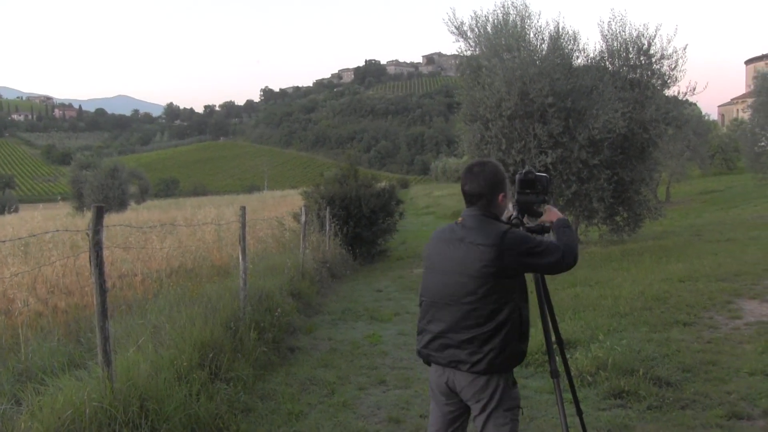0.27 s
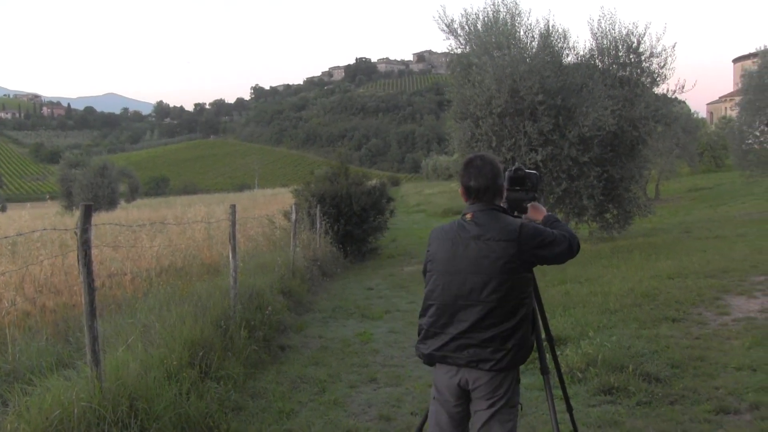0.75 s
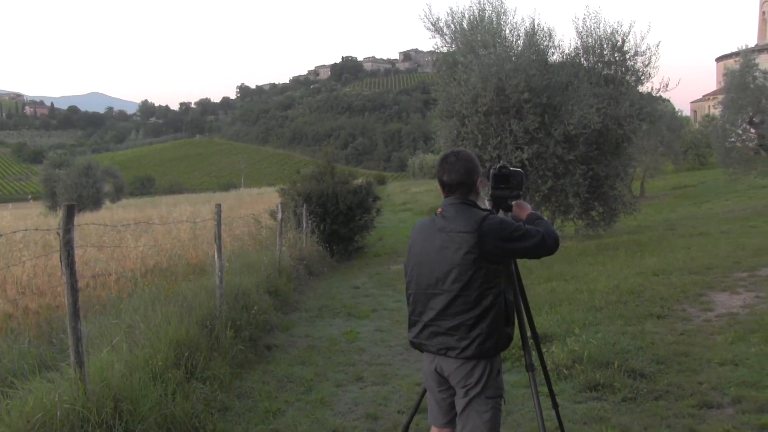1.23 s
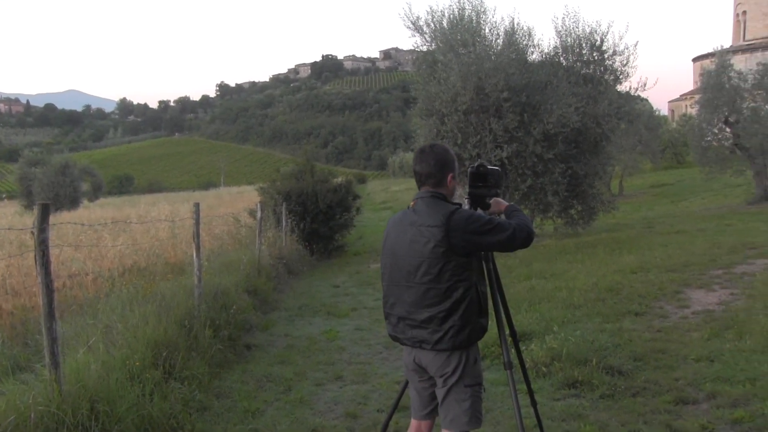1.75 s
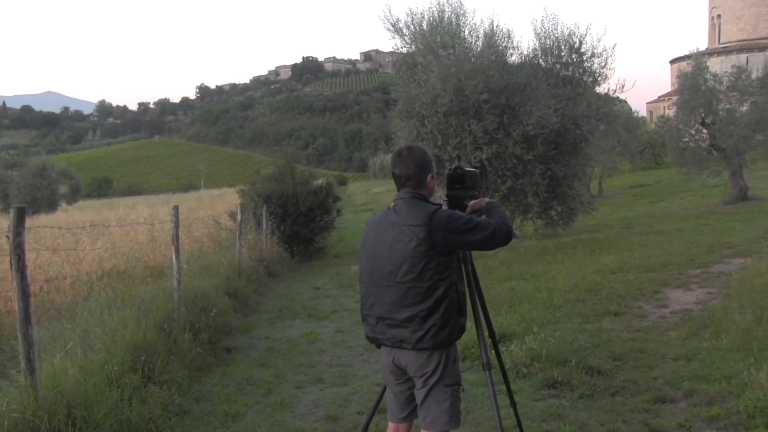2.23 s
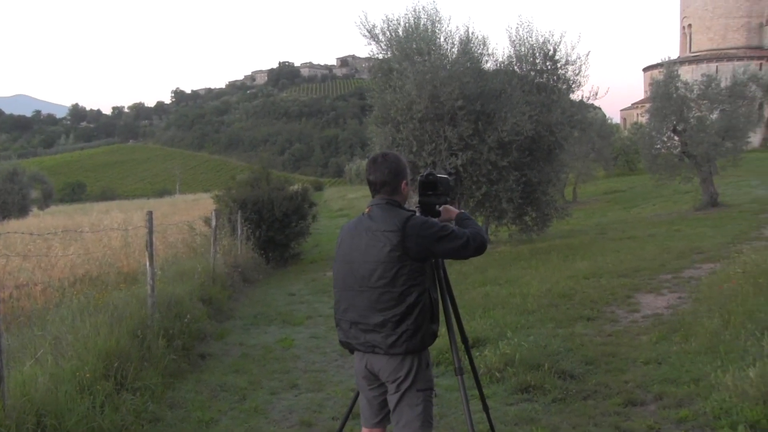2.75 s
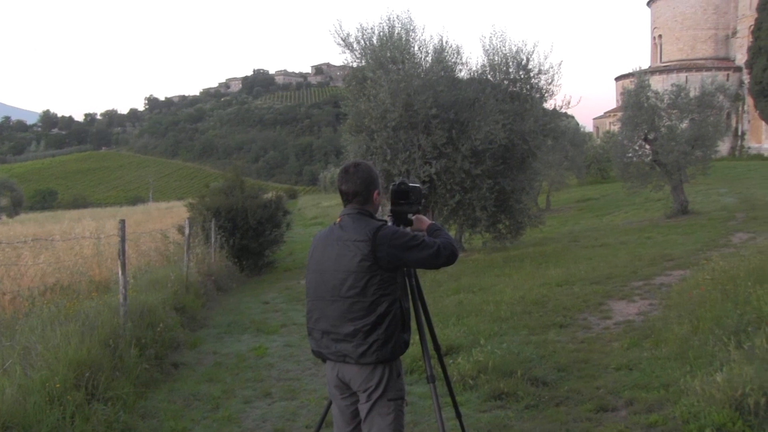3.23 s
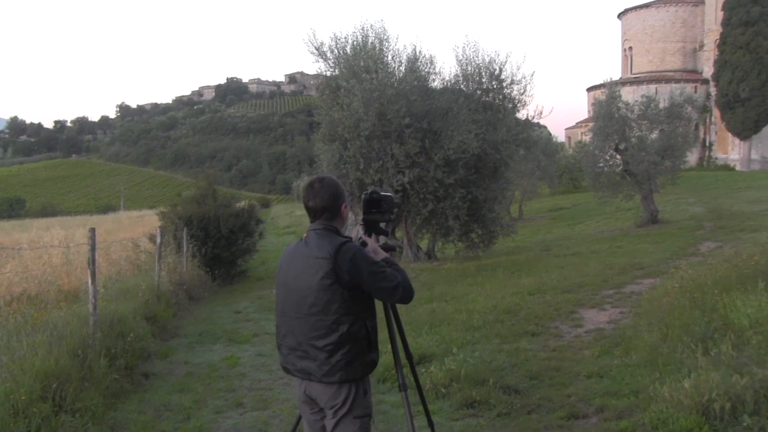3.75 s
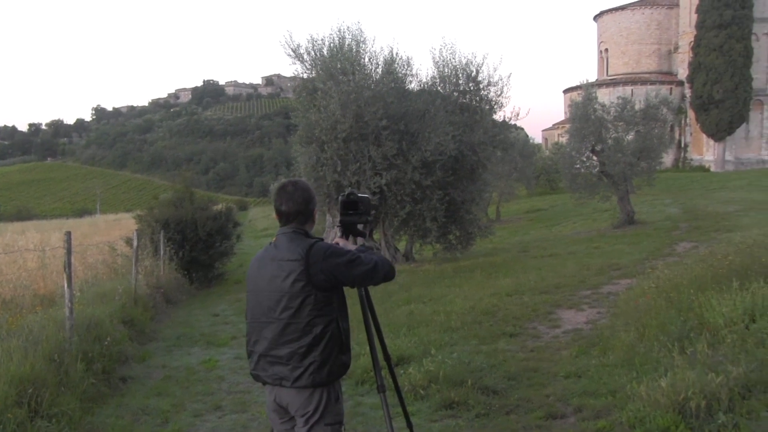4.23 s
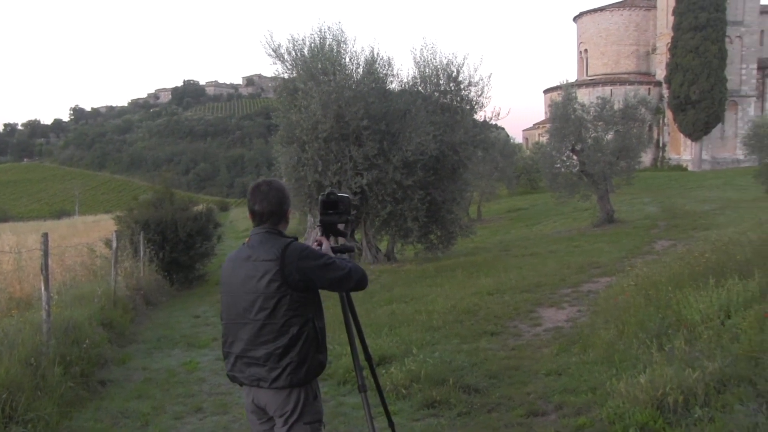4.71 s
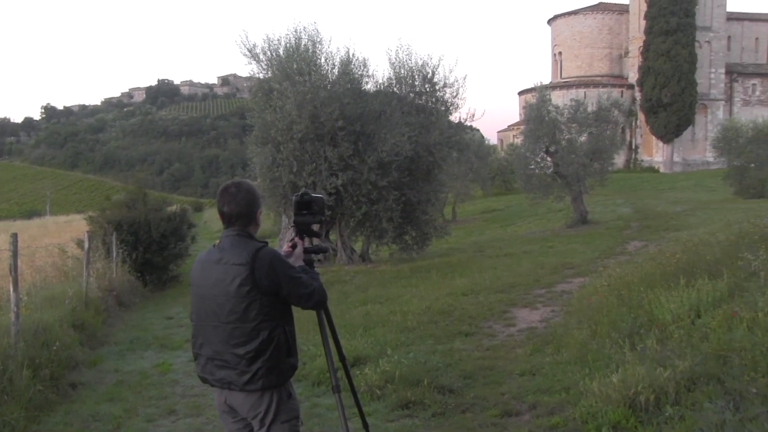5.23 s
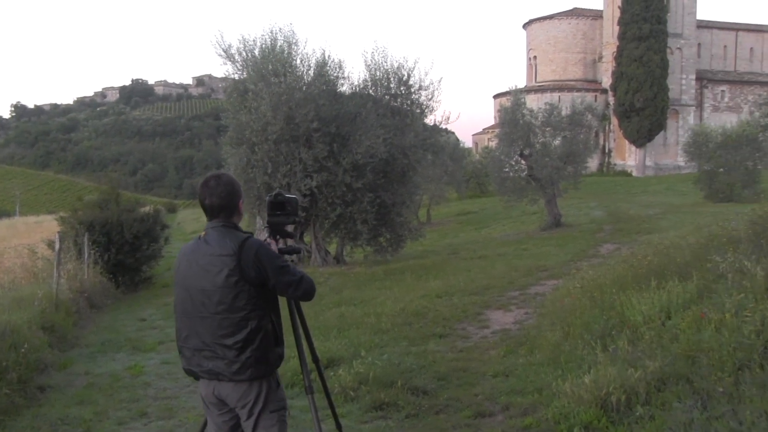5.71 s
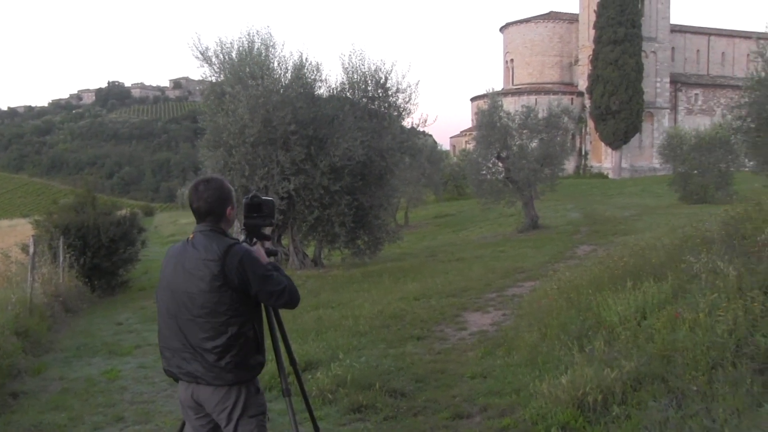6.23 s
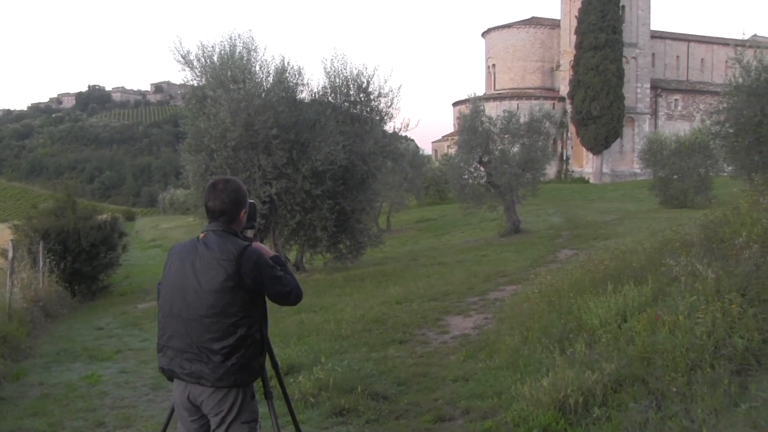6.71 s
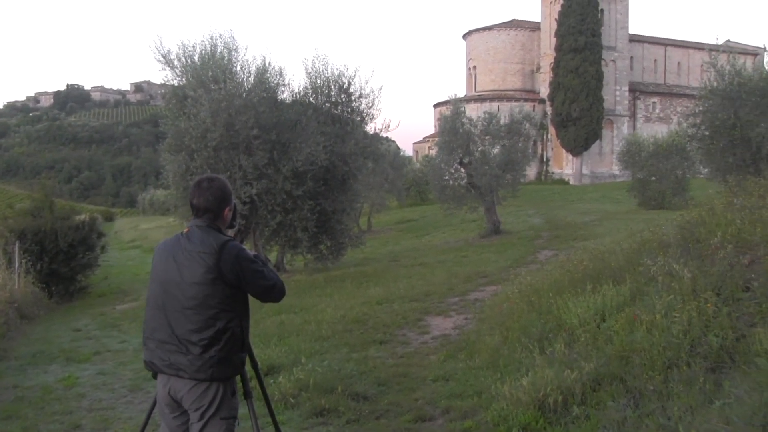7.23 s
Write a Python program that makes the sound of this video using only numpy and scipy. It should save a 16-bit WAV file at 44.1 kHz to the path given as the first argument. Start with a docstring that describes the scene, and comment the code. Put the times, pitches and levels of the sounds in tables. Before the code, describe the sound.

Outdoor dawn chorus in open countryside. Many small sparrows chatter without pause, slightly to the right, in rapid falling bouts. A blackbird whistles short clear phrases in the first three seconds, then even piping and a few quick ticks follow. Louder, closer chirps become frequent later. Doves coo low and far away, blurring to a faint hum under soft air noise and microphone hiss in wide stereo.

```python
"""A flock of sparrows chatters to the right, in the dawn chorus of open farmland: short sine chirps swell in bouts.
Doves coo far off as slow low sines, over a bed of air noise and microphone hiss made from narrow noise bands.
Louder sparrow chirps ring out clearly, and a blackbird whistles a few phrases among piping, ticks and thin tweets.
The voices scatter off leaves and walls, which adds a short dying tail of noise to each."""
import sys
import numpy as np
from scipy import signal
from scipy.io import wavfile
from scipy.ndimage import uniform_filter1d

SR = 44100
rng = np.random.default_rng(int(sys.argv[2]) if len(sys.argv) > 2 else 0)


def generate_wav(signal):
    """Clip the signal to [-1, 1] and save it as 16-bit WAV at the path in sys.argv[1]."""
    frames = np.transpose(np.atleast_2d(signal))
    scaled = np.clip(frames, -1, 1) * 32767
    pcm = np.round(scaled).astype(np.int16)
    wavfile.write(sys.argv[1], SR, pcm)


def voltage_ratio(level):
    """Linear amplitude factor for a level in decibels (scalar or array-like)."""
    return 10 ** (np.asarray(level, float) / 20)


N = 328986   # length of the scene in samples


def rms_one(x):
    """Scale to an rms (average strength) of 1."""
    return x / np.sqrt(np.mean(x ** 2) + 1e-20)


def wobble(shape, rate_hz):
    """Smooth random wander along the last axis, spread 1: noise with its quick changes filtered away."""
    r = np.exp(-2 * np.pi * rate_hz / SR)
    return rms_one(signal.lfilter([1], [1, -2 * r, r * r], rng.standard_normal(shape)))


def sing(notes, rough, flutter_db=3.0, rate_hz=220, edge=0.09, overtone_db=-40, swing=(0, 0), buzz_db=0):
    """Sines that glide along a curved pitch, with random flutter, a regular swing and a fast throb.

    Each note: start and length in seconds, start, middle and end pitch in Hz, level in dB, left minus right in dB.
    rough: pitch flutter as a share; edge: larger is softer at both ends; swing: times per second, share of pitch.
    """
    lead_per_db = 0.25   # samples of lead for each dB of left minus right
    out = np.zeros((2, N))
    for s, length, start, middle, end, db, pan in notes:
        n = int(length * SR)
        u = np.arange(n) / n   # 0 to 1 through the note
        shake = wobble((2, n + 400), rate_hz)[:, 400:]   # one for pitch, one for level
        beat = np.sin(2 * np.pi * swing[0] * u * length)

        bow = middle - (start + end) / 2
        hz = start + (end - start) * u + 4 * u * (1 - u) * bow
        hz = hz * (1 + rough * shake[0] + swing[1] * beat)
        phase = 2 * np.pi * (np.cumsum(hz) / SR + rng.random())
        lead = 2 * np.pi * hz / SR * lead_per_db * pan / 2   # the nearer side hears the bird first
        phase = np.array([phase + lead, phase - lead])

        throb_hz = 290 * rng.uniform(0.72, 1.32)
        throb = np.sin(2 * np.pi * (throb_hz * u * length + rng.random()))
        level_db = db + flutter_db * shake[1] + 3.5 * beat + buzz_db * (throb + 0.5)
        level = voltage_ratio(level_db) * np.sin(np.pi * u ** 0.99) ** edge
        tone = np.sin(phase) + voltage_ratio(overtone_db) * np.sin(2 * phase)
        pair = level * tone * voltage_ratio(np.array([[pan], [-pan]]) / 2)

        i = round(s * SR)
        a = max(i, 0)
        b = max(a, min(i + n, N))
        out[:, a:b] += pair[:, a - i:b - i]
    return out


def scatter(x, t60, wet_db):
    """Leaves, ground and walls: a noise tail falling 60 dB in t60 seconds, a different one for each side."""
    t = np.arange(int(.5 * SR)) / SR
    fade_in = np.minimum(t / 0.019, 1)
    tail = rng.standard_normal((2, len(t))) * voltage_ratio(-60 * t / t60) * fade_in
    tail /= np.sqrt(np.sum(tail ** 2, axis=1, keepdims=True))
    return x + voltage_ratio(wet_db) * signal.fftconvolve(x, tail, axes=1)[:, :N]


def perch(hz):
    """Left minus right in dB: the higher voices sit further to the right."""
    return np.interp(hz, [3200, 4300, 5500], [-2.2, -5.0, -5.5])


def bouts(hz):
    """Level in time of the voices around hz: they swell while a bout's falling pitch passes them."""
    # Bouts of chatter that start high and tumble down.
    # Each row: start in seconds, length in seconds, top pitch in Hz, level in dB before the carry below.
    bout_rows = [(-0.19, 0.39, 4900, -43), (0.077, 0.26, 4900, -44), (0.141, 0.34, 8050, -42.5),
                 (0.357, 0.24, 4800, -42.5), (0.5, 0.28, 7730, -43), (0.618, 0.43, 6240, -45),
                 (0.904, 0.3, 4280, -43.5), (1.099, 0.27, 6300, -39.5), (1.299, 0.28, 4960, -44.5),
                 (1.536, 0.17, 4470, -41), (1.626, 0.21, 5050, -40.5), (1.88, 0.26, 5340, -44),
                 (2.048, 0.23, 6500, -44.5), (2.17, 0.43, 5160, -44.5), (2.448, 0.17, 5900, -42.5),
                 (2.497, 0.32, 5000, -45), (2.78, 0.18, 6600, -45), (2.86, 0.36, 4430, -42),
                 (3.101, 0.2, 5600, -43.5), (3.169, 0.44, 4840, -42), (3.544, 0.28, 6000, -41.5),
                 (3.62, 0.48, 9700, -46.5), (3.888, 0.44, 4830, -43), (4.195, 0.25, 5330, -42),
                 (4.36, 0.26, 5500, -43), (4.562, 0.23, 5130, -41), (4.706, 0.28, 5000, -45.5),
                 (4.87, 0.38, 5350, -41), (5.154, 0.26, 5500, -42.5), (5.344, 0.25, 6200, -42),
                 (5.412, 0.47, 5450, -46.5), (5.729, 0.25, 5170, -42), (5.892, 0.21, 6600, -43),
                 (6.001, 0.42, 5650, -42), (6.212, 0.24, 9350, -45.5), (6.29, 0.5, 5350, -44.5),
                 (6.603, 0.44, 5370, -39.5), (6.605, 0.19, 6540, -43), (6.948, 0.18, 4800, -44),
                 (7.01, 0.36, 4100, -45), (7.221, 0.31, 6850, -40)]
    end_hz, reach_oct = 2790, 0.36   # where every bout lands; how far in pitch it draws voices in
    lull_db = -81                    # chatter between bouts, before the carry below

    t = np.arange(0, N + 100, 100) / SR
    octaves = np.log2(hz / 4000)
    carry_db = -5.5 * octaves                          # higher voices carry less
    carry_db = carry_db + 0.27 * t * min(octaves, 0)   # voices under 4 kHz lose ground as time passes
    carry_db = carry_db - 3 * (hz > 6000)              # the thinnest voices carry still less

    power = voltage_ratio(lull_db) ** 2
    for s, length, top_hz, db in bout_rows:
        u = np.clip((t - s) / length, 0, 1)
        bout_hz = top_hz * (end_hz / top_hz) ** u
        away = np.log2(bout_hz / hz) / reach_oct
        power = power + (voltage_ratio(db) * np.sin(np.pi * u)) ** 2 * np.exp(-away ** 2)
    return np.interp(np.arange(N) / SR, t, np.sqrt(power) * voltage_ratio(carry_db))


def flock():
    """Overlapping short chirps, mostly arched and falling fast, in groups of voices that swell with the bouts."""
    # The low, middle, high and top voices of the flock. Each row: chirps per second, centre in Hz,
    # pitch spread in octaves, fall in octaves (each chirp falls by its own random multiple of it).
    voice_groups = [(104.94, 3300, 0.1001, 0.231), (84.97, 4220, .095, 0.19), (64.95, 5150, 0.11, 0.1595),
                    (34.98, 6300, 0.11, 0.121)]
    out = 0
    for rate, hz, spread, fall in voice_groups:
        even = rng.random((1300, 2))
        bell = np.clip(rng.standard_normal((1300, 5)), -1.8, 1.8)
        draws = np.column_stack([even, bell])
        at = np.cumsum(.3 + 1.4 * draws[:, 0]) / rate - .05
        notes = []
        for t, (_, long, pitch, slide, bend, loud, side) in zip(at[at < N / SR], draws):
            centre = hz * 2 ** (spread * pitch)
            drop = 2 ** (fall * (.68 + 0.703 * slide) / 2)   # half the fall, on each side of the centre
            middle = centre * (1.02 + 0.0398 * bend)
            db = 3.77 * loud - 1.5 * pitch
            pan = perch(centre) + 2.8 * side
            notes.append((t, .009 + .024 * long, centre * drop, middle, centre / drop, db, pan))
        chirps = sing(notes, rough=0.012, edge=0.16, overtone_db=-27.5, buzz_db=4)
        voices = scatter(chirps, t60=0.12, wet_db=-2.5)
        # partly even out the crowd before the bouts shape it
        crowd = uniform_filter1d(np.mean(voices ** 2, axis=0), size=2600) + 1e-12
        out = out + rms_one(voices / crowd ** 0.28) * bouts(hz)
    return out


def near_doves():
    """A few coos that stand out: slow low sines whose pitch bows, further up in longer coos."""
    # The coos. Each row: start in seconds, length in seconds, start pitch in Hz, end pitch in Hz, level in dB.
    coos = [(-.05, 0.34, 468.6, 477, -54), (1.1, 0.43, 472.4, 493, -54.5), (1.78, 0.21, 553.6, 480.4, -55),
            (2.52, 0.14, 518.5, 453, -57), (2.87, 0.3, 462, 456, -54), (5.2, 0.168, 468.4, 523, -54),
            (5.5, 0.37, 501.6, 477, -53.5), (6.28, 0.13, 501, 481.6, -55.5)]
    arch_per_s = 0.1268   # bow as a share of pitch, for each second of length
    notes = []
    for s, length, a, b, db in coos:
        middle = (a + b) / 2 * (1 + arch_per_s * length)
        notes.append((s, length, a, middle, b, db, 1.5))
    near = sing(notes, rough=0.003, flutter_db=0.5, rate_hz=14, edge=0.16)
    return scatter(near, t60=0.36, wet_db=-9)


def far_doves():
    """Many far coos at random pitches, blurred by a long tail into a low hum."""
    notes = []
    for k, (height, late, long, start, end, side) in enumerate(rng.random((130, 6))):
        hz = 505 * (.88 + .27 * height)
        at = k * .06 - .3 + .05 * late
        start_hz = hz * (.95 + 0.073 * start)
        end_hz = hz * (.92 + 0.074 * end)
        notes.append((at, 0.0595 + .14 * long, start_hz, hz, end_hz, 0, 1.5 * (side - .5)))
    hum = scatter(sing(notes, rough=0.0395, rate_hz=34.5), t60=0.95, wet_db=-0.5)
    return voltage_ratio(-59.5) * rms_one(hum)


def air(patchy_db):
    """Air and microphone hiss: narrow bands of stereo noise, each with its level, slow flicker and likeness."""
    # Colour of the noise. Each row: frequency in Hz, relative level per Hz in dB.
    colour = np.array([(25, -15.5), (60, -5), (150, -2.5), (400, -0.5), (800, -4.5), (1900, -7),
                       (3000, 0.5), (6000, -13.5), (9000, -17), (13000, -21), (17000, -28)])
    # How alike left and right are. Each row: frequency in Hz, likeness from -1 (opposite) to 1 (the same).
    likeness = np.array([(40, 1), (150, -0.013), (700, -0.12), (1500, 0.56), (5000, 0.69), (9000, 0.95),
                         (14000, 0.9)])
    treble_hz, rustle_db = 6000, 0.23   # bands above this swell and sink together by this spread

    out = 0
    edges = 20 * 2 ** np.arange(0, 10.1, .4)
    rustle = np.repeat(wobble(N // 50 + 1, 400), 50)[:N]   # stretched 50 times: 400 becomes 8 Hz
    white = rng.standard_normal((2, 2, N))
    for k, (low, high) in enumerate(zip(edges, edges[1:])):
        band = signal.butter(2, [low, high], "band", fs=SR, output="sos")
        mid, side = signal.sosfilt(band, white[k % 2])   # neighbouring bands use different noise
        place = np.log(low * high) / 2
        alike = np.clip(np.interp(place, np.log(likeness[:, 0]), likeness[:, 1]), -1, 1)
        db = np.interp(place, np.log(colour[:, 0]), colour[:, 1])
        flicker = np.repeat(wobble(N // 50 + 1, 250), 50)[:N]   # stretched: 250 becomes 5 Hz
        level_db = db + patchy_db * flicker + (low > treble_hz) * rustle_db * rustle
        pair = np.sqrt(1 + alike) * mid + np.sqrt(1 - alike) * side * [[1], [-1]]
        out = out + voltage_ratio(level_db) * pair
    return voltage_ratio(-50) * rms_one(out)


def near_sparrows():
    """Short, clear, loud chirps with an overtone and a slight throb, most nearly level, a few falling steeply."""
    # The loudest chirps. Each row: start in seconds, length in seconds, start pitch in Hz, end pitch in Hz,
    # level in dB.
    chirps = [(0.286, 0.031, 5450, 4600, -47), (0.643, 0.05, 4890, 3320, -43),
              (1.202, 0.021, 5300, 4970, -41), (1.361, 0.047, 4800, 5200, -47),
              (2.9, 0.05, 3400, 3280, -39), (3.706, 0.052, 3290, 3150, -42), (4.232, .055, 5080, 5070, -50),
              (4.308, 0.022, 3220, 2200, -51.5), (4.592, 0.028, 4056, 4070, -38),
              (4.997, 0.033, 5030, 4850, -39.5), (5.232, 0.066, 3990, 4400, -38.5),
              (5.418, 0.043, 4080, 4010, -40.5), (5.452, 0.04, 3260, 3230, -42.5),
              (5.748, 0.05, 4190, 4290, -34.5), (5.949, 0.053, 5530, 3980, -46),
              (6.003, 0.04, 4190, 2766, -43.5), (6.136, 0.044, 4030, 4130, -40),
              (6.201, 0.024, 3250, 3140, -37.5), (6.23, 0.051, 4470, 4660, -43),
              (6.69, .03, 4230, 4330, -42), (7.203, 0.04, 4180, 4380, -36.5),
              (7.268, 0.037, 4240, 4290, -40.5), (7.305, 0.041, 5780, 4150, -41),
              (7.369, .02, 4310, 4230, -46)]
    notes = [(s, length, a, a + 0.48 * (b - a), b, db, perch(a)) for s, length, a, b, db in chirps]
    loud_chirps = sing(notes, rough=0.0061, flutter_db=2.5, edge=0.35, overtone_db=-22, buzz_db=2)
    return scatter(loud_chirps, t60=0.044, wet_db=-5.5)


def small_calls():
    """Level piping, quick falling ticks and thin high tweets, all as short clear sines."""
    # A level whistle repeated. Each row: start in seconds, level in dB.
    piping = [(2.391, -51), (2.6, -49), (2.778, -47), (2.978, -47.5), (3.175, -45.5), (3.366, -45)]
    # Quick falling ticks. Each row: start in seconds, level in dB.
    ticks = [(3.85, -60), (4.037, -54), (4.232, -48), (4.417, -51)]
    # Thin high tweets. Each row: start in seconds, start pitch in Hz, end pitch in Hz, level in dB.
    tweets = [(0.626, 9340, 8300, -49)]
    notes = [(s, .086, 2590, 2590, 2625, db, .1) for s, db in piping]
    notes += [(s, .018, 2400, 1900, 1400, db, .1) for s, db in ticks]
    notes += [(s, .03, a, (a + b) / 2, b, db, -3.0) for s, a, b, db in tweets]
    return sing(notes, rough=0.0077, flutter_db=1.0, rate_hz=74, edge=0.21)


def blackbird():
    """Clear whistled slides and arches, and trills whose pitch and level swing together."""
    # Slides. Each row: start in seconds, length in seconds, start pitch in Hz, end pitch in Hz, level in dB.
    whistles = [(0.768, 0.032, 1550, 1690, -52), (1.1, .05, 1780, 1940, -56),
                (1.172, 0.072, 2200, 1740, -50), (1.38, 0.075, 2150, 1906, -48),
                (1.582, 0.064, 2960, 2670, -41.5), (2.392, .14, 1724, 1867, -51),
                (2.603, 0.087, 1836, 2145, -47.5), (2.751, 0.05, 1750, 2060, -49)]
    # Arches, up and down again. Each row: start in seconds, length in seconds, foot in Hz, top in Hz,
    # level in dB.
    arches = [(2.26, 0.16, 1720, 1863, -56), (2.53, 0.073, 1924, 2250, -44),
              (6.625, .16, 1620, 2160, -55.5)]
    # Trills on a level pitch. Each row: start in seconds, length in seconds, pitch in Hz, level in dB,
    # swings per second.
    trills = [(1.454, 0.115, 2070, -51.5, 33), (2.786, 0.093, 2040, -47.5, 84)]
    haste = 0.136       # at half time a slide is ahead of its straight path by this share
    trill_swing = 6.0   # share of pitch times swings per second: quick trills swing less

    notes = [(s, length, a, a + (.5 + haste) * (b - a), b, db, 2.5) for s, length, a, b, db in whistles]
    notes += [(s, length, foot, top, foot, db, 2.5) for s, length, foot, top, db in arches]
    clear = sing(notes, rough=0.0077, flutter_db=1.0, rate_hz=74, edge=0.21)
    for s, length, hz, db, rate in trills:
        note = (s, length, hz, hz, hz, db, 2.5)
        clear += sing([note], rough=0.025, flutter_db=2.5, edge=0.059, swing=(rate, trill_swing / rate))
    return clear


def held_note():
    """The blackbird's long held note: one sine whose pitch and level move from point to point."""
    # Points along the note. Each row: time in seconds, pitch in Hz, rms level in dB.
    held_points = [(1.852, 1794, -64), (1.865, 1880, -52), (1.891, 2120, -46), (2.09, 2165, -47),
                   (2.129, 2224, -44.5), (2.186, 2690, -47.5), (2.21, 2650, -64.5)]
    s, hz, db = np.transpose(held_points)
    t = np.arange(N) / SR
    held = np.sin(2 * np.pi * np.cumsum(np.interp(t, s, hz)) / SR) * np.sqrt(2)
    held *= voltage_ratio(np.interp(t, s, db)) * (t > s[0]) * (t < s[-1])
    return held * voltage_ratio(np.array([[1.3], [-1.3]]))   # a little to the left


def songbirds():
    """The blackbird and the small calls, scattered together by a longer tail than the sparrows have."""
    return scatter(small_calls() + blackbird() + held_note(), t60=0.31, wet_db=-7.5)


def scene():
    """All singers over the air."""
    doves = near_doves() + far_doves()
    return flock() + doves + air(patchy_db=1.48) + near_sparrows() + songbirds()


def roll_off(x):
    """The treble ends steeply here."""
    return signal.sosfilt(signal.butter(12, 15760, fs=SR, output="sos"), x)


def record(dry):
    """Turns the finished mix into the sound that is written out."""
    return roll_off(dry)


dry = scene()
out = record(dry)
generate_wav(out)
```